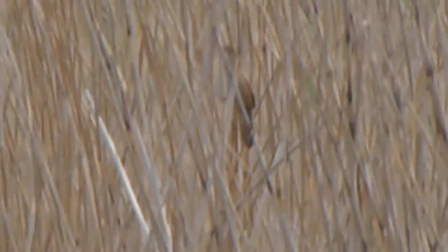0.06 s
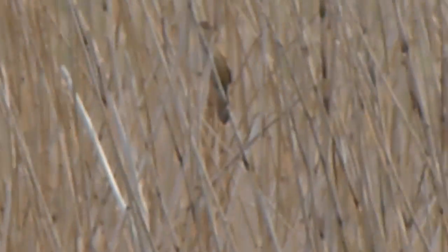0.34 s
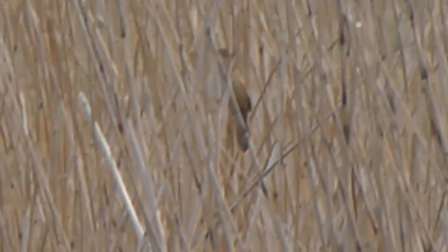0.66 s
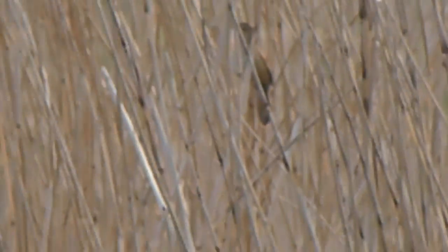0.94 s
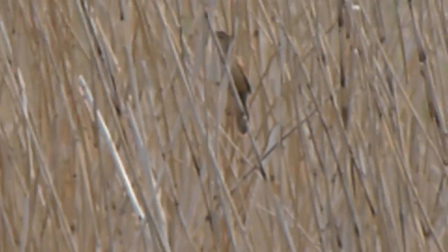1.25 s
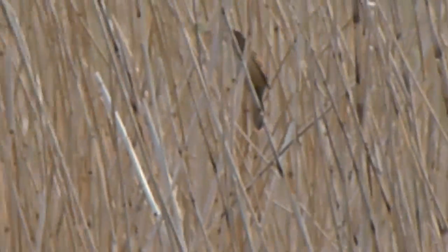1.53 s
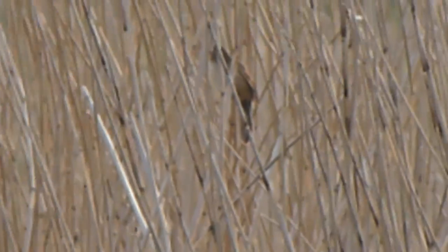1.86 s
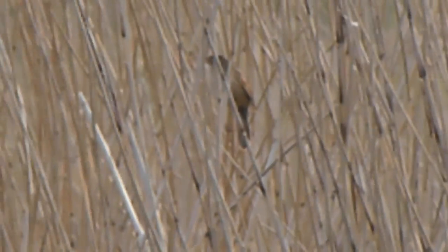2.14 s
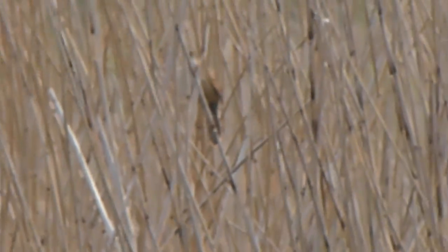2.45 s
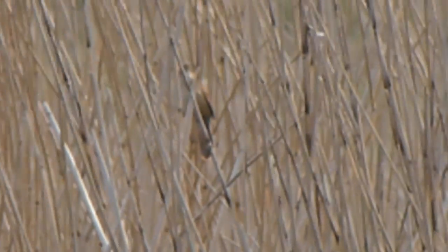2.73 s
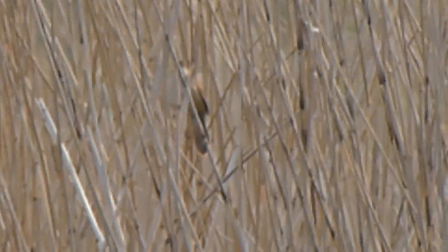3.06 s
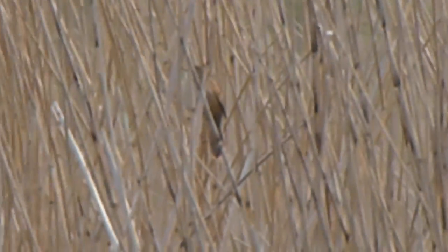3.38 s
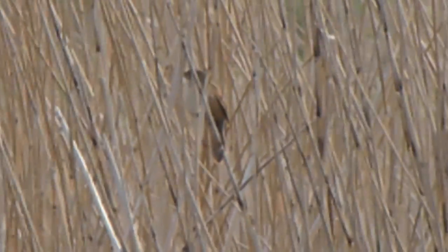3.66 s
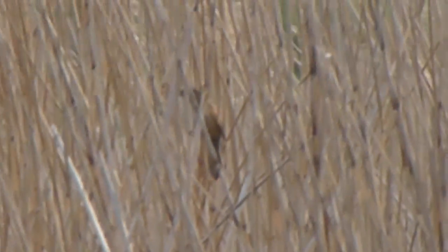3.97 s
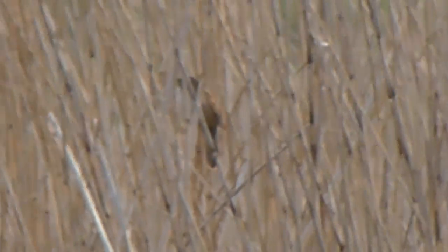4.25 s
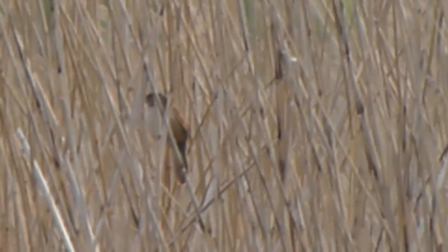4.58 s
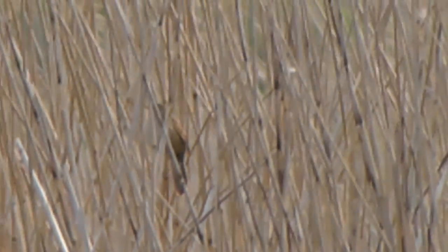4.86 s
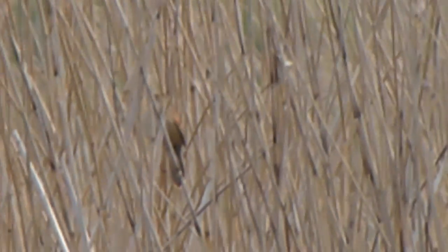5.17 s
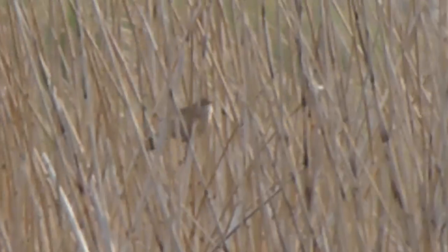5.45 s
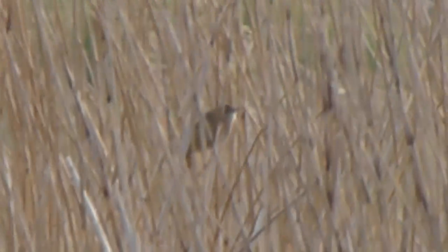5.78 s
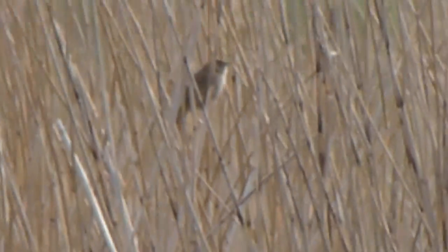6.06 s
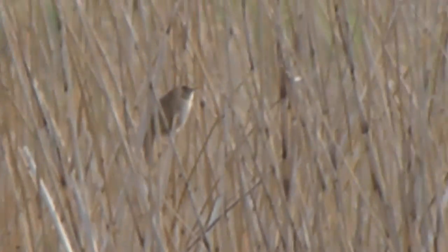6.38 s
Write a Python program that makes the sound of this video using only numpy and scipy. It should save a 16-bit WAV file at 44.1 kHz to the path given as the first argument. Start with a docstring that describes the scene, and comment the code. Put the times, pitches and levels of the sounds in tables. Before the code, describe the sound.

A reedbed with a faint steady murmur and a blur of distant birdsong. From the start a small warbler close by sings a fast, high, buzzing reel, fading slightly and stopping at 1.5 seconds; three short harsh churrs come in the first 0.6 seconds. From 1.3 to 3.3 seconds another bird repeats high, raspy paired chirps. Short trills and sliding whistles come throughout, mostly from the left. From 2.8 seconds a bird repeats steeply falling notes about three times a second, joined by quick runs of upward sweeps around 4.4 and 5.2 seconds and buzzy whistles near 5.6 to 6.3. A waterbird honks briefly at the very start, loudest at 2.3, and again at 3.4, 5 and 6.3 seconds, echoing faintly, with soft distant hoots between. From about 5.4 seconds a gust buffets the microphone with a loud, uneven low rumble, peaking near 6 and lasting to the end at 6.6.

```python
"""A reedbed in spring.

A small warbler reels close by (a fast, even run of ticks and pulses) and stops after a second and a half.
Other songbirds chirp, whistle and trill around it in nearly pure, sliding tones, and a waterbird honks
over the water. The reeds scatter the calls. Near the end a gust of wind buffets the microphone."""
import sys
import numpy as np
from scipy import signal
from scipy.fft import rfft, irfft
from scipy.io import wavfile

SR = 44100
rng = np.random.default_rng(int(sys.argv[2]) if len(sys.argv) > 2 else 0)


def transcribe(u):
    """Save the signal u as a 16-bit wav file named by the first command-line argument.

    u: samples, shape (n,) or (channels, n), limited to [-1, 1]; the rate is SR.
    q: integer samples, one column per channel.
    """
    v = np.clip(np.atleast_2d(u).T, -1, 1)
    q = np.round(v * 32767).astype(np.int16)
    wavfile.write(sys.argv[1], SR, q)


N = 291484
TIME = np.arange(N) / SR


def reel(start_s=.0165, end_s=1.5, beat_s=.02018, pitch_hz=4020, glide_hz=300, fade_db_per_s=4.5):
    """The warbler: about fifty beats a second, each a falling tick and then a short round pulse."""
    out = np.zeros(N)
    for beat in np.arange(start_s, end_s, beat_s):
        t, u = span(.0053 * (1 + .1 * rng.normal()))
        pulse = np.sin(np.pi * u) * syrinx(pitch_hz + glide_hz * (u - .5) + 55 * rng.normal())
        add(out, beat - t[-1] / 2, pulse * from_db(-2.5 + rng.normal()))
        t, u = span(.003)
        tick = fade(t, .00075) * u * syrinx(glide(u, 8000, 3700, ease=2))
        add(out, beat - .0095, tick * from_db(-4 + 2 * rng.normal()))
    return out * from_db(-36.5 - fade_db_per_s * TIME)


def churrs(throbs_per_s=48):
    """Harsh calls close by: high noise in a quick throb."""
    # Each row: start in seconds, end in seconds, level in dB.
    calls = [(0, .09, -53), (0.279, 0.367, -50.5), (0.523, 0.625, -50.5)]
    out = np.zeros(N)
    for start, end, db in calls:
        t, _ = span(end - start)
        throb = np.sin(np.pi * throbs_per_s * t) ** 2
        add(out, start, from_db(db) * throb * fade(t, .0097) * band_noise(4300, 7600, len(t)))
    return out


def chirps(gap_s=.0738, rise_s=.012, top_hz=6650, warble_hz=480, throat_hz=5900, gain_db=1):
    """Warbling arches of pitch over a rasp, loudest as they pass the pitch at which the throat rings."""
    # Each row: time of a group's first pitch peak in seconds, number of chirps, level in dB.
    groups = [(1.272, 2, -46.5), (1.563, 2, -46), (1.834, 2, -46), (2.102, 2, -40.5), (2.378, 2, -39.5),
              (2.628, 2, -44.5), (2.898, 2, -45.5), (3.146, 3, -49)]
    out = np.zeros(N)
    for first, count, db in groups:
        for k in range(round(count)):
            peak = first + k * gap_s
            voice_db, rasp_db = (db + 1, -47.5) if k else (db, -57.5)   # later chirps are much raspier
            fall_s = .024 * (1 + .1 * rng.normal())
            t, _ = span(rise_s + fall_s)
            past_peak = t - rise_s
            drop_hz = np.where(past_peak < 0, 1700 * (past_peak / rise_s) ** 2, 1900 * past_peak / fall_s)
            warbles_per_s = 115 * (1 + .128 * rng.normal())
            hz = top_hz - drop_hz + warble_hz * np.cos(2 * np.pi * warbles_per_s * past_peak)
            resonance = 1 / (1 + ((hz - throat_hz) / 850) ** 2)
            voice = resonance * syrinx(hz, waver=.023, overtone_db=-29)
            shape = fade(t, .0018) * np.interp(past_peak, [-rise_s, 0], [.45, 1])
            add(out, peak - rise_s, from_db(voice_db + gain_db) * shape * voice)
            t, u = span(.061)
            grain = from_db(rasp_db - 4.9 * u + 4.6 * drift(398, len(t)))
            add(out, peak - .024, grain * fade(t, .0037) * band_noise(4200, 6120, len(t)))
    return out


def flicks(note_s=.027, gain_db=-.5):
    """Runs of quick upward sweeps, loudest half way, no two quite alike."""
    # Each row: middle of the first note, end of the run and note spacing in seconds, then level in dB.
    runs = [(4.417, 4.76, .0617, -44.5), (5.165, 5.59, .0657, -43.5)]
    out = np.zeros(N)
    notes = [(when, db) for first, end, gap, db in runs for when in np.arange(first, end, gap)]
    for when, db in notes:
        t, u = span(note_s * (1 + .14 * rng.normal()))
        hz = np.interp(u, [0, .35, .55, 1], [3000, 3750, 4750, 5650]) * (1 + .0356 * rng.normal())
        level = gain_db + db - 28 * abs(u - .5) + 3 * drift(330, len(t))
        add(out, when - t[-1] / 2, from_db(level) * fade(t, .0015) * syrinx(hz, waver=.032))
    return out


def whistle(length, first_hz, last_hz, flutter_db=2):
    """One whistle that slides from one pitch to another while its loudness flutters."""
    t, u = span(length)
    flutter = from_db(flutter_db * drift(112, len(t)))
    return flutter * fade(t, .0023) * syrinx(glide(u, first_hz, last_hz, ease=1.25))


def whistles(gain_db=1):
    """Single sliding whistles from the birds around."""
    # Each row: start and length in seconds, first and last pitch in Hz, level in dB.
    notes = [(.632, 0.15, 4570, 3760, -53), (1.161, 0.2, 5090, 3810, -54.5), (1.408, .12, 8100, 7750, -68),
             (1.632, .012, 4470, 3420, -50), (1.901, 0.014, 3360, 2970, -47.5),
             (1.928, 0.013, 4920, 3720, -52), (1.971, 0.013, 3200, 3000, -49.5),
             (2.09, .027, 4050, 4260, -48.5), (2.217, 0.015, 5080, 3620, -48.5),
             (2.261, 0.032, 3790, 3100, -52.5), (2.458, .023, 4430, 4920, -48),
             (2.483, .016, 5380, 3970, -44), (2.778, .019, 3560, 3630, -50.5),
             (3.315, 0.013, 4520, 4720, -43), (3.334, 0.017, 5420, 3960, -44),
             (3.595, 0.03, 4400, 4130, -52), (3.657, 0.031, 4700, 4110, -53.5),
             (3.97, .026, 3770, 3890, -49.5), (4.136, .06, 4290, 3580, -54.5),
             (4.346, .12, 5950, 4950, -54), (4.587, .014, 8050, 6000, -53), (4.612, 0.022, 7700, 4900, -54),
             (5.02, 0.0138, 5500, 3820, -50), (5.083, 0.047, 4280, 4690, -49),
             (5.255, 0.025, 4400, 4180, -49), (5.624, .022, 4220, 3930, -47.5),
             (5.972, 0.029, 5000, 4050, -48), (6.011, 0.0089, 4660, 4250, -39),
             (6.377, 0.027, 2755, 3190, -48), (6.479, 0.02, 4140, 3750, -46.5),
             (6.527, 0.017, 5850, 6520, -53.5), (6.566, .041, 4150, 4900, -55),
             (6.571, .012, 6600, 5080, -53)]
    out = np.zeros(N)
    for start, length, first_hz, last_hz, db in notes:
        add(out, start, from_db(gain_db + db) * whistle(length, first_hz, last_hz))
    return out


def dives(top_hz=7300, drop_s=.0105, edge_s=.008, fade_db_per_s=95, gain_db=.5):
    """About three times a second, one bird drops steeply from the same top and settles on a held pitch."""
    # Each row: start and length in seconds, held pitch in Hz, level in dB.
    notes = [(2.761, 0.052, 4800, -50), (3.116, 0.056, 3430, -49), (3.474, 0.052, 4830, -48),
             (3.83, 0.046, 3050, -45), (4.159, .12, 4720, -50), (4.481, 0.093, 3480, -50),
             (4.784, 0.094, 4180, -45), (5.133, .058, 4820, -48), (5.489, 0.11, 3520, -44.5),
             (5.841, 0.055, 4890, -44), (6.209, .11, 3470, -53.5)]
    out = np.zeros(N)
    for start, length, held_hz, db in notes:
        t, _ = span(length)
        level = gain_db + db - fade_db_per_s * t - drift(125, len(t))
        hz = held_hz + (top_hz - held_hz) * np.exp(-t / drop_s)
        add(out, start, from_db(level) * fade(t, edge_s) * syrinx(hz))
        if held_hz > 4500:   # high notes slide down a second step
            add(out, start + length - edge_s / 2, from_db(db - 3) * whistle(.053, held_hz, 3450))
    return out


def buzzes(wobbles_per_s=290, wobble_hz=130):
    """Long whistles that rise and level out; a very fast wobble in pitch makes them buzz."""
    # Each row: start and end in seconds, first and last pitch in Hz, first and last level in dB.
    notes = [(4.198, 4.34, 4490, 4650, -51, -64), (5.593, 5.784, 4260, 4920, -43.5, -51.5),
             (5.781, 5.887, 4900, 4930, -58, -43), (6.061, 6.154, 4500, 5450, -46, -61),
             (6.17, 6.292, 5580, 5780, -62, -61)]
    out = np.zeros(N)
    for start, end, first_hz, last_hz, first_db, last_db in notes:
        t, u = span(end - start)
        wobble = wobble_hz * tone(wobbles_per_s * (1 + .085 * drift(98, len(t))))
        hz = glide(u, first_hz, last_hz, ease=1.5) + wobble
        add(out, start, from_db(first_db + (last_db - first_db) * u) * fade(t, .013) * syrinx(hz))
    return out


def trills(swing_hz=480, sag_hz=110, gain_db=3.5):
    """Fast trills: pitch and loudness swell together in every pulse."""
    # Each row: start and length in seconds, middle pitch and fall in Hz, pulses a second, level in dB.
    calls = [(.851, 0.084, 3080, 220, 100, -58), (1.048, 0.074, 3440, 242, 126, -54),
             (1.465, 0.093, 3140, 270, 106, -52), (1.768, 0.097, 3195, 110, 125, -48.5),
             (2.117, 0.079, 3860, 38, 120, -51.5), (2.354, 0.071, 3830, 0, 130, -43.5),
             (2.603, 0.078, 3860, 26, 102, -52), (3.172, .1, 3786, 0, 92, -49),
             (3.458, 0.12, 2920, 343, 66, -52), (3.689, 0.079, 3344, 77, 80, -51.5),
             (3.811, .119, 3810, 135, 132, -46), (3.993, 0.12, 2960, 380, 73, -51.5),
             (4.875, 0.091, 4670, 1402, 71, -45), (5.048, 0.043, 4000, 0, 60, -47),
             (5.353, 0.089, 6600, 0, 70, -63), (6.26, 0.074, 3250, 794, 66, -49.5)]
    out = np.zeros(N)
    for start, length, middle_hz, fall_hz, rate, db in calls:
        t, u = span(length)
        cycle = t * rate % 1
        swell = np.sin(np.pi * cycle)
        hz = middle_hz + fall_hz * (.5 - u) + swing_hz * (swell - .85) - sag_hz * (2 * cycle - 1)
        level = gain_db + db + 1.6 * drift(rate, len(t))
        add(out, start, from_db(level) * swell ** 1.2 * fade(t, .003) * syrinx(hz, waver=.025))
    return out


def honks(droop=.253, catch_s=.0384):
    """A waterbird: a hoarse catch breaks into a clear note that arches and sags at its end."""
    # Each row: start and length in seconds, pitch in Hz, then the levels in dB
    # of the lowest tone, the tone an octave above it and the hoarse catch.
    calls = [(-.05, .1, 739, -47.5, -50.5, -70), (2.286, 0.1, 759.6, -42, -41.5, -30.5),
             (3.373, 0.1, 730, -61, -43.5, -41.5), (5.041, 0.108, 758, -42.5, -49, -47),
             (6.307, 0.086, 722, -61, -44, -55)]
    out = np.zeros(N)
    for start, length, pitch, low_db, octave_db, catch_db in calls:
        t, u = span(length)
        hz = pitch * (1 - droop * (u - .36) ** 2 + .0015 * drift(270, len(t)))
        levels = [low_db, octave_db, octave_db - 14] + [octave_db - 27] * 5
        voice = sum(from_db(db) * tone(k * hz) for k, db in enumerate(levels, 1))
        add(out, start, fade(t, .023) * voice)
        t, u = span(catch_s)
        rattle_hz = pitch / 3 * (1 + .121 * (u - 1) + .062 * drift(385, len(t)))
        catch = rms_one(sum(tone(k * rattle_hz) for k in range(3, 8)))
        add(out, start - .025, from_db(catch_db) * fade(t, .003) * u * catch / 2)
    return out


def clucks(droop=.08, overtone_db=-12):
    """Short falling hoots of distant waterbirds."""
    # Each row: start and length in seconds, pitch in Hz, level in dB.
    calls = [(.065, 0.057, 1495, -50.5), (1.002, 0.03, 610, -45.5), (1.02, 0.041, 848, -48),
             (1.124, 0.014, 420, -48), (1.124, 0.021, 677, -46.5), (3.475, 0.045, 1320, -49),
             (3.63, 0.089, 815, -56.5), (4.92, 0.052, 1015, -52.5), (6.53, 0.058, 837, -55)]
    out = np.zeros(N)
    for start, length, pitch, db in calls:
        t, u = span(length)
        hz = pitch * (1 + droop * (.5 - u) + .011 * drift(400, len(t)))
        voice = tone(hz) + from_db(overtone_db) * tone(2 * hz)
        add(out, start, from_db(db) * np.sin(np.pi * u) * voice)
    return out


def wind(gain_db=2, lump_db=2.5, eddy_width_s=.027):
    """Wind buffets the microphone's two sides unevenly; sharp eddies (swirls) add a brighter flutter."""
    # Each row: time in seconds, level of the gust in dB.
    gust = [(5.1, -61.5), (5.402, -45.5), (5.43, -30.5), (5.556, -34), (5.57, -26.5), (5.674, -39.5),
            (5.772, -23), (5.888, -33), (6.014, -20), (6.254, -28.5), (6.28, -24.5), (6.51, -29.5),
            (6.54, -38), (6.61, -32)]
    # Each row: frequency in Hz, level of the rumble there in dB.
    rumble_colour = [(25, -21), (50, -12), (90, -0.5), (150, -1), (210, -1.5), (300, -9.5), (500, -20.5),
                     (1000, -34.5), (2000, -54), (4000, -69)]
    # Each row: time of an eddy in seconds, level in dB.
    eddies = [(5.816, -39), (6.012, -30.5), (6.08, -30.5), (6.179, -30.5), (6.285, -34), (6.362, -34),
              (6.514, -40)]
    # Each row: time and half length of a light puff in seconds, level in dB.
    puffs = [(0.98, 0.017, -47), (1.74, 0.048, -52.5), (1.842, 0.074, -50.5), (1.13, 0.039, -57.5),
             (3.07, .02, -52)]
    force = from_db(gain_db + curve(gust)) * np.clip((TIME - gust[0][0]) / .1, 0, 1)
    lumps = from_db(lump_db * np.array([drift(35), drift(35)]))
    rumble = stereo_noise(rumble_colour, likeness=[(60, -.22), (130, .46), (260, .04), (640, -.71)])
    eddy_force = sum(from_db(db) * bump(when, eddy_width_s) for when, db in eddies)
    flutter = stereo_noise(colour=[(100, -21), (300, -5), (450, 0), (800, -7.5), (1500, -18.5), (3500, -58)],
                           likeness=[(300, -.12), (1000, -.69)])
    puffing = sum(from_db(db) * bump(when, half) for when, half, db in puffs) * band_noise(28, 128, N)
    swirling = eddy_force * flutter * from_db(4 * drift(130))
    return pan(force * lumps * rumble + swirling + puffing, left_db=1.5)


def far_birds(first_s=3.563, end_s=4.36, gap_s=.145, fade_db_per_s=11, stray_count=120):
    """Deeper in the reeds: one bird repeats a falling note, ever fainter, and others add stray sweeps."""
    out = np.zeros(N)
    t, u = span(.045)
    for start in np.arange(first_s, end_s, gap_s):
        db = -53.5 - fade_db_per_s * (start - first_s)
        add(out, start, from_db(db) * fade(t, .0065) * syrinx(glide(u, 2750, 1850, ease=1.59)))
    for when, pitch, length, slope, loud in rng.random((stray_count, 5)):
        t, u = span(.0124 + .0396 * length)
        hz = (2800 + 2500 * pitch) * (1 + .404 * (slope - .7) * (u - .5))
        add(out, when * TIME[-1], from_db(-56 + 4 * loud) * np.sin(np.pi * u) * syrinx(hz, waver=.022))
    return out


def marsh():
    """Three beds of noise: a low far-off murmur that swells once, a blur of distant song and a thin hiss."""
    # Each row: frequency in Hz, level of that noise there in dB.
    murmur_colour = [(30, -1), (80, -1), (160, -2.5), (300, -1), (600, 4), (1000, -0.5), (1600, -6.5),
                     (2500, -13.5), (5000, -39)]
    chorus_colour = [(1500, -7), (2300, -1.5), (3200, 0.5), (4200, 4), (5800, -7), (7000, -13),
                     (9000, -22.5)]
    hiss_colour = [(1000, 0), (7000, -0.5), (9000, -1.5), (12000, -5), (15500, -13)]
    # Each row: time in seconds, level of that noise in dB.
    chorus_levels = [(0, -47.5), (.7, -52.5), (2, -54.5), (4.4, -52), (5.8, -53), (6.15, -54.5),
                     (6.6, -48.5)]
    hiss_levels = [(0, -62.5), (5.6, -64.5), (5.98, -59), (6.06, -68), (6.6, -68)]
    # Each row: frequency in Hz, how alike left and right are (1 is the same, 0 is unrelated).
    likeness = [(60, 0.95), (290, 0.97), (640, 0.8), (1400, 0.6), (3100, 0.18), (7000, 0.062), (12000, 0)]
    murmur_db = -52 + 3 * bump(4.85, .43) + .9 * drift(12)
    murmur = from_db(murmur_db) * stereo_noise(murmur_colour, likeness)
    chorus = from_db(curve(chorus_levels) - .5 + 2 * drift(25)) * stereo_noise(chorus_colour, likeness)
    hiss = from_db(curve(hiss_levels) + 1) * stereo_noise(hiss_colour, likeness)
    return murmur + chorus + hiss


def syrinx(hz, waver=.011, overtone_db=-50):
    """A songbird's voice organ: it makes a nearly pure tone, slightly unsteady."""
    hz = hz * (1 + waver * drift(707, len(hz)))
    return tone(hz) + from_db(overtone_db) * tone(2 * hz)


def in_reeds(x, left_db, near_db, near_s, far_db=-17):
    """A bird to one side: near stems scatter its sound, and the wider reedbed adds a faint long tail."""
    near = from_db(near_db) * scatter(x, near_s, build_s=.0052)
    far = from_db(far_db) * scatter(x, tail_s=.9, build_s=.081)
    return pan(x, left_db) + near + far


def over_water(x, echo_s=.52, echo_db=-22):
    """Waterbird calls linger over the open water and return faintly from the far bank."""
    bright = signal.sosfilt(signal.butter(2, 1100, "high", fs=SR, output="sos"), x)
    echo = from_db(echo_db) * np.interp(TIME - echo_s, TIME, bright, left=0)
    calls = in_reeds(x, left_db=5, near_db=-14, near_s=.1, far_db=-24)
    lingering = from_db(-9) * scatter(bright, tail_s=1.1, build_s=.1)
    return calls + lingering + scatter(echo, tail_s=.26, build_s=.01)


def scatter(x, tail_s, build_s):
    """Countless small echoes, different left and right, that die away by 60 dB over tail_s."""
    t, _ = span(tail_s)
    tail = rng.standard_normal((2, len(t))) * from_db(-60 * t / tail_s) * np.clip(t / build_s, 0, 1)
    tail /= np.sqrt(np.sum(tail ** 2, axis=1, keepdims=True))
    return signal.fftconvolve(x[None], tail, axes=1)[:, :N]


def stereo_noise(colour, likeness):
    """Noise shaped by (Hz, dB) colour points; (Hz, likeness) points say how alike its two sides are."""
    hz = np.fft.rfftfreq(N, 1 / SR)
    mid, side = rfft(rng.standard_normal((2, N))) * from_db(at_hz(colour, hz))
    alike = np.clip(at_hz(likeness, hz), -.99, .99)
    return rms_one(irfft(np.sqrt(1 + alike) * mid + np.sqrt(1 - alike) * side * [[1], [-1]], N))


def band_noise(low_hz, high_hz, size):
    """Noise between two frequencies, at strength 1."""
    band = signal.butter(5, [low_hz, high_hz], "band", fs=SR, output="sos")
    return rms_one(signal.sosfilt(band, rng.standard_normal(size)))


def drift(rate, size=N):
    """A random wander that heads for a new value `rate` times a second."""
    steps = np.arange(size) * rate / SR
    count = int(steps[-1]) + 2
    return np.interp(steps, np.arange(count), rng.standard_normal(count))


def tone(hz):
    """A sine wave of strength 1 that follows a pitch."""
    return np.sqrt(2) * np.sin(2 * np.pi * np.cumsum(hz) / SR)


def glide(u, first_hz, last_hz, ease):
    """A pitch that moves fastest at first, then levels out."""
    return last_hz + (first_hz - last_hz) * (1 - u) ** ease


def span(length):
    """Seconds into a note (t), and the share of it gone by (u, from 0 to 1)."""
    t = np.arange(max(int(length * SR), 64)) / SR
    return t, t / t[-1]


def fade(t, edge_s):
    """A smooth rise and fall at the two ends of a note."""
    return np.sin(np.pi / 2 * np.clip(np.minimum(t, t[-1] - t) / edge_s, 0, 1)) ** 2


def bump(peak_s, width_s):
    """A bell-shaped swell around one moment."""
    return np.exp(-((TIME - peak_s) / width_s) ** 2)


def curve(rows):
    """Join (seconds, value) rows by straight lines."""
    return np.interp(TIME, *np.transpose(rows))


def at_hz(points, hz):
    """Read between (Hz, value) points, with octaves evenly spaced."""
    point_hz, values = np.transpose(points)
    return np.interp(np.log(hz + 1), np.log(point_hz), values)


def from_db(db):
    """Turn decibels into a multiplier."""
    return 10 ** (np.asarray(db) / 20)


def rms_one(x):
    """Scale a sound to an average strength (rms) of 1."""
    return x / np.sqrt(np.mean(x ** 2) + 1e-20)


def pan(x, left_db):
    """Make the left side louder than the right by left_db."""
    return x * from_db(left_db / 2 * np.array([[1], [-1]]))


def add(track, start, sound):
    """Mix a sound in at a time in seconds."""
    at = int(round(start * SR))
    first, last = max(at, 0), min(at + len(sound), N)
    if last > first:
        track[first:last] += sound[first - at:last - at]


def scene():
    """The birds in their places, over the marsh and the wind."""
    birds = in_reeds(reel() + churrs(), left_db=1.5, near_db=-3, near_s=.11)
    birds += in_reeds(chirps(), left_db=-1.5, near_db=-7, near_s=.28, far_db=-19.5)
    birds += in_reeds(flicks(), left_db=-1, near_db=-1, near_s=.2)
    birds += in_reeds(whistles() + dives() + buzzes(), left_db=7.5, near_db=-4, near_s=.25)
    birds += in_reeds(trills(), left_db=6.5, near_db=-3.5, near_s=.15)
    birds += in_reeds(far_birds(), left_db=-2, near_db=-2, near_s=.36)
    return birds + over_water(honks() + clucks()) + marsh() + wind()


def record(dry):
    """The treble above 15700 Hz is cut off steeply."""
    return signal.sosfilt(signal.ellip(10, .1, 80, 15700, fs=SR, output="sos"), dry)


dry = scene()
out = record(dry)
transcribe(out)
```